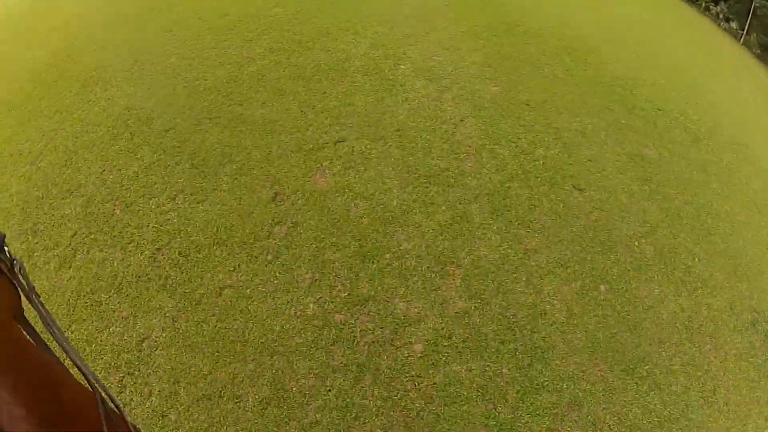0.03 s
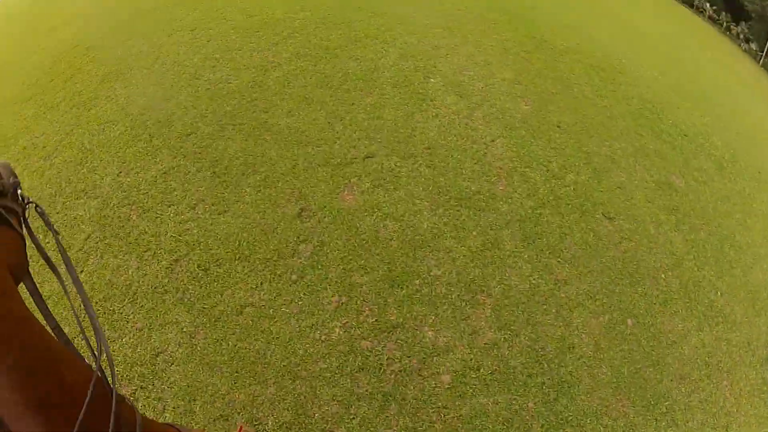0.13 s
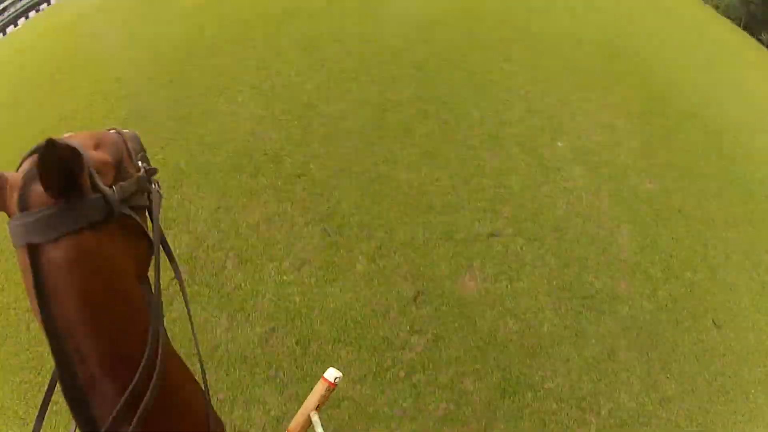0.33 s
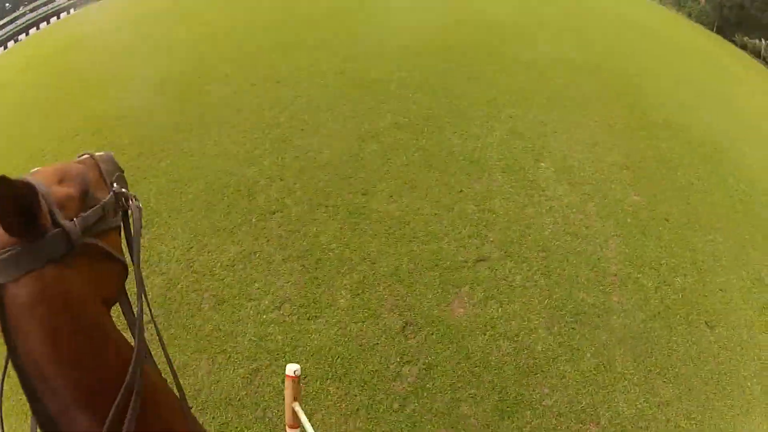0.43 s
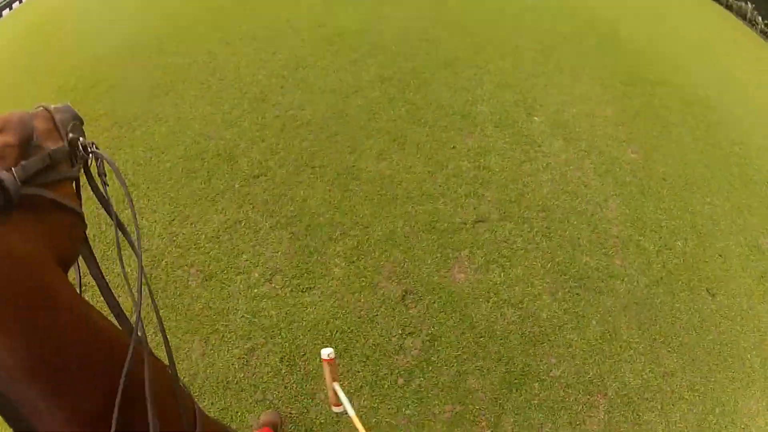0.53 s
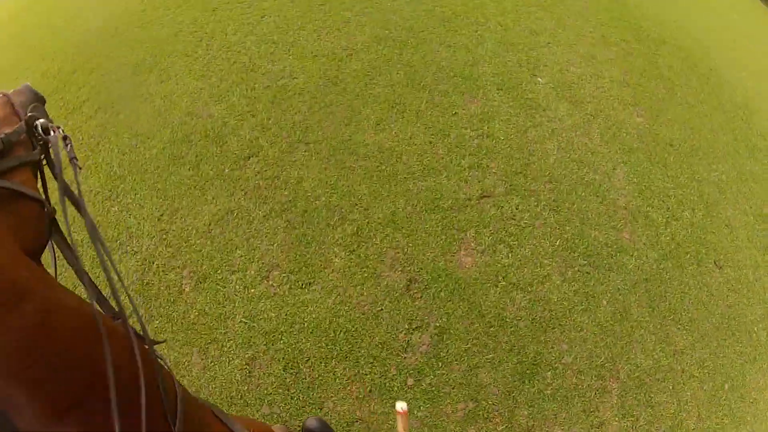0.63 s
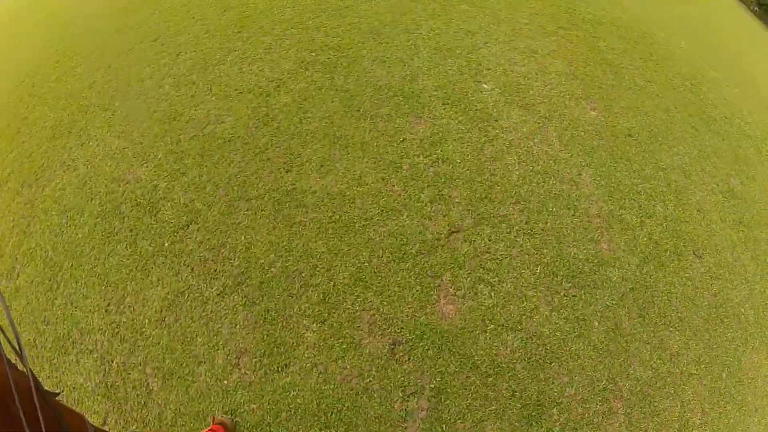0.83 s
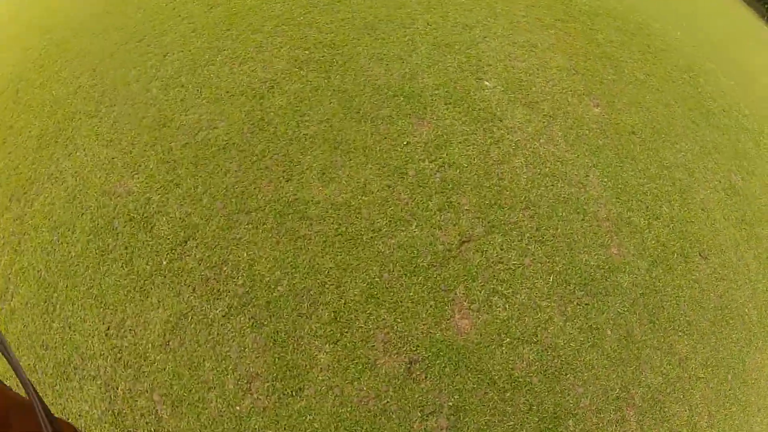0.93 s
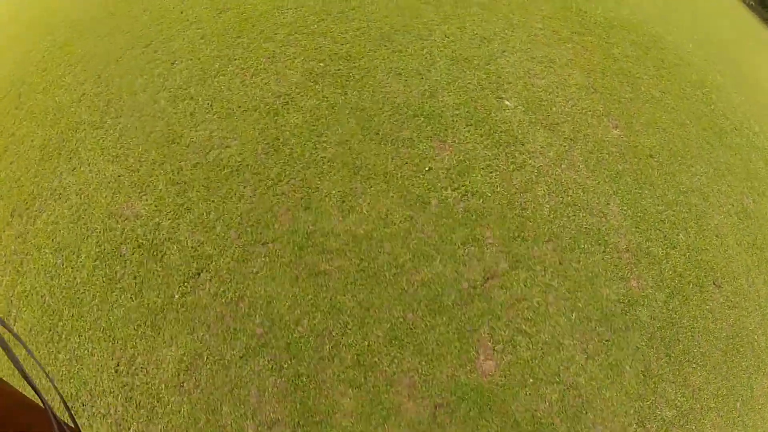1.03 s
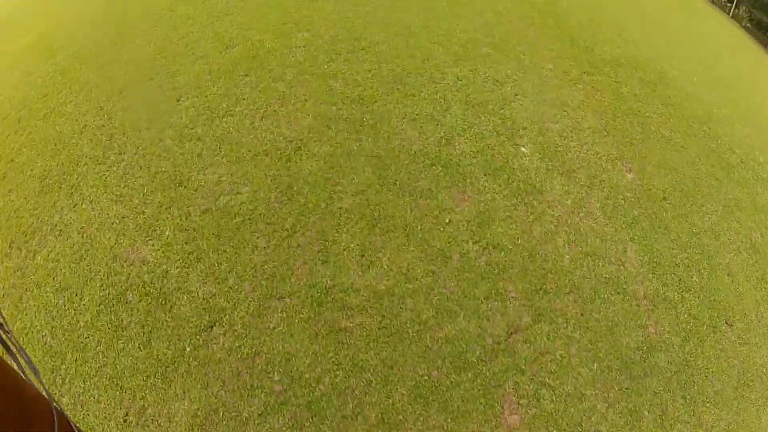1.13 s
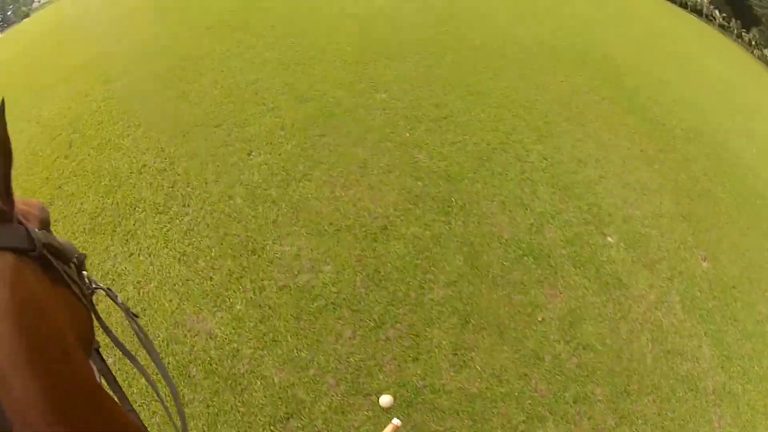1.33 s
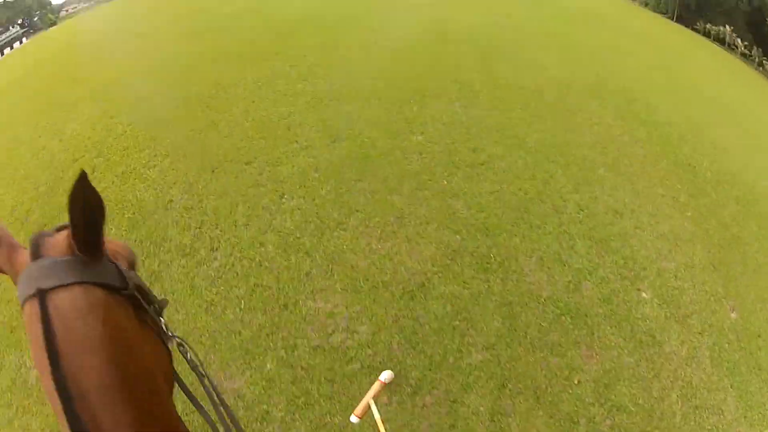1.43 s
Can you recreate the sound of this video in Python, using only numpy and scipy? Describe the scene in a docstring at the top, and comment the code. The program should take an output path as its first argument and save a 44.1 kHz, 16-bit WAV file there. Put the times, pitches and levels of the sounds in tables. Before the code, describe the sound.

A mallet cracks hard on a ball at 0.23 s, bright and woody with a very short hollow ring and no echo. A much weaker, clustered glancing knock follows at 1.20 s. Throughout, tack ticks and rustles, busier after 1.1 s; dull turf hoof thuds fall near 0.3, 0.6, 0.85 and 1.07 s. A strap creaks downward at 1.3 s. Low wind buffets the slightly gritty, muffled case microphone.

```python
"""A polo mallet cracks against a ball twice, heard from a cased camera on the rider of a cantering horse.
Each stroke is coloured contact impulses, gritty scrapes and decaying modes; hooves on turf are dull modes.
Tack ticks as impulses with grit and rustles as filtered noise; a strap creaks once on falling harmonics.
Wind buffets the case as filtered noise. The field is open, so nothing echoes.
The camera holds each of its coarse samples, which adds a thin sheen."""
import sys
import numpy as np
from scipy import signal
from scipy.fft import rfft, irfft, next_fast_len
from scipy.io import wavfile
from scipy.ndimage import map_coordinates

SR = 44100
rng = np.random.default_rng(int(sys.argv[2]) if len(sys.argv) > 2 else 0)


def master(y):
    """Save y as 16-bit WAV."""
    cut = np.clip(np.atleast_2d(y).T, -1, 1)
    pcm = np.round(cut * 32767)  # scale
    wavfile.write(sys.argv[1], SR, pcm.astype(np.int16))


N = 66150  # samples, 1.5 s
TIME = np.arange(N) / SR
HIT_TIME = np.arange(SR // 8) / SR  # time axis of one short sound
IMPULSE = 1.0 * (HIT_TIME == 0)
SIZE = next_fast_len(N + SR // 2)  # padded transform length
FREQS = np.fft.rfftfreq(SIZE, 1 / SR)


def amp(db):
    """Decibels to gain."""
    return 10 ** (np.asarray(db) / 20)


def unit(x):
    """Scale to rms 1."""
    return x / np.sqrt(np.mean(x ** 2) + 1e-20)


def burst(x):
    """Scale a short sound to the energy of 6 ms at rms 1."""
    return x / np.sqrt(np.sum(x ** 2) / (0.006 * SR) + 1e-20)


def coloured(x, points):
    """Causal minimum-phase filter through (Hz, dB) points, by folding the cepstrum."""
    hz, db = np.transpose(points)
    gain_db = np.interp(np.log(FREQS + 1), np.log(hz), db)
    cepstrum = irfft(np.log(amp(gain_db)), SIZE)
    cepstrum[1:SIZE // 2] *= 2
    cepstrum[SIZE // 2 + 1:] = 0
    response = np.exp(rfft(cepstrum))
    return irfft(rfft(x, SIZE) * response, SIZE)[:len(x)]


def curves(rows):
    """One value per sample for each column after the time."""
    times, *columns = np.transpose(rows)
    return [np.interp(TIME, times, column) for column in columns]


def wobble(rate):
    """A smooth random curve, rate knots a second."""
    knots = rng.standard_normal(int(N * rate / SR) + 4)
    return map_coordinates(knots, [TIME * rate])


def fade(t60):
    """Exponential decay by 60 dB in t60 seconds."""
    return np.exp(-np.log(1000) * HIT_TIME / t60)


def ring(modes, attack_s, stretch=1):
    """Damped modes with a soft start; stretch multiplies every pitch."""
    tone = sum(amp(db) * fade(t60) * np.sin(2 * np.pi * hz * stretch * HIT_TIME)
               for hz, db, t60 in modes)
    return burst(tone * (1 - np.exp(-HIT_TIME / attack_s)))


def grit(t60):
    """A dying puff of noise with energy 1."""
    puff = rng.standard_normal(len(HIT_TIME)) * fade(t60)
    return puff / np.linalg.norm(puff)


def struck(force, points):
    """Contact forces through a body of the given colour."""
    body_response = burst(coloured(IMPULSE, points))
    return signal.fftconvolve(force, body_response)[:N]


def add(track, start_s, sound):
    """Mix a sound in at its start time."""
    part = track[max(round(start_s * SR), 0):][:len(sound)]
    part += sound[:len(part)]


# Contacts of mallet and ball out on the open field, each stroke with its rebounds.
# Each row: start in seconds, crack level in dB, ring level in dB, scrape level in dB, ring pitch as a ratio.
MALLET_CONTACTS = [(.2327, -11, -12.5, -25.5, 1), (.2377, -27.5, -54, -29, 1),
                   (1.2012, -34, -39.5, -37, .96), (1.2037, -34.5, -24, -33, .96),
                   (1.2034, -24.5, -28.5, -29, .96), (1.2122, -37.5, -33, -40, 1.1)]
# The crack of wood on ball. Each row: frequency in Hz, relative level in dB.
CRACK_COLOUR = [(200, -19), (750, -2), (1000, -17.5), (1300, -6.5), (1500, 0), (1950, 4), (2450, -6),
                (2900, 1), (3400, -9), (4300, -19.5), (5200, -16), (6000, -13)]
# The hollow ring after a stroke.
# Each row: frequency in Hz before the pitch ratio, relative level in dB, decay by 60 dB in seconds.
HOLLOW_MODES = [(110, -17, 0.054), (351, -3.5, 0.03), (532, 5, 0.032), (720, 1.5, 0.013)]
# The dull knock of the mallet head.
# Each row: frequency in Hz, relative level in dB, decay by 60 dB in seconds.
HEAD_MODES = [(770, -0.5, 0.017), (1036, 1, 0.017), (1380, -3.5, 0.021)]
RING_LAG_S, RING_ATTACK_S, SCRAPE_T60_S = 0.0011, 0.00039, 0.015
GLANCE_S, GLANCE_DB = 1.2035, -27  # the second, glancing stroke also knocks the head


def mallet():
    """Each contact is a hard crack, a brief scrape and a hollow ring."""
    force, body = np.zeros((2, N))
    for start_s, crack_db, ring_db, scrape_db, pitch_ratio in MALLET_CONTACTS:
        crack = amp(crack_db) * IMPULSE
        scrape = amp(scrape_db) * grit(SCRAPE_T60_S)
        add(force, start_s, crack + scrape)
        hollow = amp(ring_db) * ring(HOLLOW_MODES, RING_ATTACK_S, pitch_ratio)
        add(body, start_s + RING_LAG_S, hollow)
    add(body, GLANCE_S, amp(GLANCE_DB) * ring(HEAD_MODES, RING_ATTACK_S))
    return struck(force, CRACK_COLOUR) + body


# Hoof falls on the turf, below the rider's microphone.
# Each row: start in seconds, level in dB, pitch in Hz, decay by 60 dB in seconds.
HOOF_FALLS = [(0.1335, -47, 150, 0.041), (.3085, -34, 392, 0.014), (0.588, -33, 132, 0.079),
              (0.8522, -26.5, 228, 0.03), (1.068, -33, 100, 0.076), (1.35, -39, 110, 0.024)]
HOOF_ATTACK_S = 0.0046
HOOF_BODY_RATIO, HOOF_BODY_DB = 0.7, -4  # a second, lower mode, relative to the first


def hooves():
    """Soft turf gives dull thuds: two quickly damped modes with a slow attack."""
    out = np.zeros(N)
    for start_s, db, hz, t60 in HOOF_FALLS:
        modes = [(hz, 0, t60), (hz * HOOF_BODY_RATIO, HOOF_BODY_DB, t60)]
        add(out, start_s, amp(db) * ring(modes, HOOF_ATTACK_S))
    return out


# Ticks of tack that knock through the camera mount.
# Each row: start in seconds before the lag, then, before the trims, bright click level in dB,
# woody clack level in dB and mount knock level in dB.
TACK_TICKS = [(0.023, -44, -47, -33.5), (0.0677, -40, -51, -40.5), (0.081, -42, -50, -36.5),
              (0.0995, -44, -55, -37.5), (0.1313, -30, -41.5, -37.5), (0.1521, -38, -51, -38),
              (0.2773, -40, -51, -48), (0.3072, -42, -44.5, -26), (0.3904, -55, -50.5, -41),
              (0.4264, -45, -37, -48), (0.5014, -48, -45.5, -46), (0.5207, -34.5, -44.5, -41.5),
              (0.5471, -37, -47, -45), (0.5591, -38, -48, -37), (0.7846, -42.5, -56, -40),
              (0.8385, -42, -57, -50), (0.85, -38, -49.5, -37.5), (0.8731, -41, -59, -45),
              (0.9562, -40.5, -47.5, -43), (0.9956, -43, -48, -43), (1.0913, -37, -46.5, -42),
              (1.1237, -40.5, -55, -38), (1.1368, -35.5, -42, -31.5), (1.2461, -38, -53, -32),
              (1.2623, -38, -48, -34), (1.2864, -34, -51, -28.5), (1.3285, -34.5, -44.5, -31.5),
              (1.3774, -35.5, -62, -29.5), (1.4162, -36, -49.5, -35.5), (1.4467, -32.5, -49.5, -33.5),
              (1.163, -39, -50, -43), (1.1726, -36.5, -48, -39), (1.1812, -38.5, -47, -30),
              (1.1906, -30.5, -48, -30.5)]
# The bright tick of tack. Each row: frequency in Hz, relative level in dB.
CLICK_COLOUR = [(300, -7), (1500, -12), (2200, 4), (2800, 7.5), (3600, 0), (4500, -6.5), (5100, -4),
                (5800, -14)]
# The woody tick of tack. Each row: frequency in Hz, relative level in dB.
CLACK_COLOUR = [(300, -2.5), (1100, 0), (1400, -3), (1750, -3), (2200, 2.5), (3000, -2.5), (6000, -45)]
# The knock of the mount that carries the camera.
# Each row: frequency in Hz before a random detune, relative level in dB, decay by 60 dB in seconds.
MOUNT_MODES = [(374, 8.5, 0.015), (522, 11.5, .022), (601.5, 6, 0.03)]
CLICK_TRIM_DB, CLACK_TRIM_DB, KNOCK_TRIM_DB = -12.5, -5, -2
TICK_LAG_S, TICK_T60_S = 0.001, 0.023
TICK_GRIT_DB = 1.5  # relative to the impulse of the contact
KNOCK_ATTACK_S, KNOCK_DETUNE = 0.0026, 0.05  # detune is a standard deviation, as a ratio


def tack():
    """Gritty ticks, woody or bright, each with a small knock of the mount."""
    clicks, clacks, knocks = np.zeros((3, N))
    for start_s, click_db, clack_db, knock_db in TACK_TICKS:
        start_s = start_s + TICK_LAG_S
        contact = IMPULSE + amp(TICK_GRIT_DB) * grit(TICK_T60_S)
        add(clicks, start_s, amp(click_db + CLICK_TRIM_DB) * contact)
        add(clacks, start_s, amp(clack_db + CLACK_TRIM_DB) * contact)
        stretch = 1 + KNOCK_DETUNE * rng.standard_normal()
        knock = ring(MOUNT_MODES, KNOCK_ATTACK_S, stretch)
        add(knocks, start_s, amp(knock_db + KNOCK_TRIM_DB) * knock)
    return struck(clicks, CLICK_COLOUR) + struck(clacks, CLACK_COLOUR) + knocks


# Rise and fall of the roar in the case and of the rustle on the rider, before trims and flutter.
# Each row: time in seconds, roar level in dB, rustle level in dB.
MOTION_LEVELS = [(0, -40.5, -60), (0.06, -48, -63), (0.15, -38, -58.5), (0.21, -49, -61),
                 (0.28, -40, -62.5), (0.35, -47, -60), (0.43, -41, -59), (0.49, -45.4, -64),
                 (0.56, -43, -63.5), (0.62, -38, -58.5), (0.66, -52.5, -66), (0.73, -50, -63),
                 (0.78, -41.5, -66), (0.91, -54, -63), (0.98, -41, -59.7), (1.07, -46, -65.5),
                 (1.15, -43.5, -59), (1.5, -45.5, -65)]
# The colour of the rustling tack. Each row: frequency in Hz, relative level in dB.
RUSTLE_COLOUR = [(300, 5.5), (1000, 3.5), (1500, -4), (2100, 1.5), (2800, 0), (3600, -3.5), (4500, -5.5),
                 (5100, -5), (5700, -18), (6000, -25)]
HISS_DB, GRAIN_DB = 1.5, 4.5  # relative to the rustle level
GRAINS_PER_S, GRAIN_SPREAD_DB = 750, -4  # the spread scales an exponential draw, capped at 3
RUSTLE_FLUTTER_DB, RUSTLE_FLUTTER_KNOTS_PER_S = -2.07, 39.44
SWING_S, SWING_WIDTH_S, SWING_DB = 1.22, 0.056, 3.5  # grains rattle harder around the second swing


def rustle():
    """Cloth and leather rub: an uneven fine hiss with tiny grains that swell as the rider swings."""
    _, level_db = curves(MOTION_LEVELS)
    spread_db = GRAIN_SPREAD_DB * np.minimum(rng.exponential(size=N), 3)
    sizes = amp(spread_db) * rng.choice([-1, 1], N)
    grain_starts = rng.random(N) < GRAINS_PER_S / SR
    grains = unit(coloured(sizes * grain_starts, RUSTLE_COLOUR))
    hiss = unit(coloured(rng.standard_normal(N), RUSTLE_COLOUR))
    swing_db = SWING_DB * np.exp(-((TIME - SWING_S) / SWING_WIDTH_S) ** 2)
    level = amp(level_db + RUSTLE_FLUTTER_DB * wobble(RUSTLE_FLUTTER_KNOTS_PER_S))
    return level * (amp(HISS_DB) * hiss + amp(GRAIN_DB + swing_db) * grains)


# The strap's harmonics, on the rider. Each row: multiple of the pitch, relative level in dB.
CREAK_HARMONICS = [(1, 0), (2, -7), (3, -20.5)]
CREAK_S, CREAK_LENGTH_S, CREAK_DB = 1.292, 0.0507, -34
CREAK_FROM_HZ, CREAK_TO_HZ = 390, 264  # before the jitter
CREAK_JITTER, CREAK_JITTER_KNOTS_PER_S = 0.026, 150  # jitter as a ratio of the pitch


def creak():
    """A strap slips ever more slowly as it takes the load, so the pitch falls."""
    progress = np.clip((TIME - CREAK_S) / CREAK_LENGTH_S, 0, 1)
    glide = CREAK_FROM_HZ + (CREAK_TO_HZ - CREAK_FROM_HZ) * progress ** 2
    pitch = glide * (1 + CREAK_JITTER * wobble(CREAK_JITTER_KNOTS_PER_S))
    phase = 2 * np.pi * np.cumsum(pitch) / SR
    tone = sum(amp(db) * np.sin(round(multiple) * phase) for multiple, db in CREAK_HARMONICS)
    swell = np.sqrt(np.abs(np.sin(np.pi * progress ** 2)))
    return amp(CREAK_DB) * swell * tone


# The wind's push on the camera case. Each row: time in seconds, level in dB.
BUFFET_LEVELS = [(0, -42), (0.17, -42.5), (0.35, -44.5), (0.58, -43), (0.7, -51.5), (0.8, -48.0),
                 (0.92, -47), (1.06, -44), (1.22, -46), (1.45, -43)]
# The colour of the buffeting at the case. Each row: frequency in Hz, relative level in dB.
BUFFET_COLOUR = [(15, -0.5), (30, -22), (60, 0.5), (110, -2.5), (170, -7.5), (300, -31), (700, -53)]
# The colour of the roar inside the case. Each row: frequency in Hz, relative level in dB.
ROAR_COLOUR = [(60, -60), (160, -1), (280, 2), (420, 1.5), (540, -1), (660, -2), (800, -13), (1000, -30.5),
               (1500, -26.5), (4000, -45)]
ROAR_TRIM_DB, ROAR_FLUTTER_DB, ROAR_FLUTTER_KNOTS_PER_S = -0.5, 3, 60.35


def wind():
    """Low buffeting and a fluttering roar inside the case, both filtered noise."""
    buffet_db, = curves(BUFFET_LEVELS)
    roar_db, _ = curves(MOTION_LEVELS)
    buffet = unit(coloured(rng.standard_normal(N), BUFFET_COLOUR))
    roar = unit(coloured(rng.standard_normal(N), ROAR_COLOUR))
    flutter_db = ROAR_FLUTTER_DB * wobble(ROAR_FLUTTER_KNOTS_PER_S)
    return amp(buffet_db) * buffet + amp(roar_db + ROAR_TRIM_DB + flutter_db) * roar


def scene():
    """Everything at the one microphone, as a single channel."""
    return (mallet() + hooves() + tack() + rustle() + creak() + wind())[None]


HOLD_HZ, TOP_HZ = 12000, 15450  # the camera's coarse sample rate and its upper band limit
CLIP_LEVEL = 1.15  # amplitude that the soft limit approaches


def record(dry):
    """The camera samples coarsely, squashes the loudest peak, holds each sample and limits the band."""
    coarse = signal.resample_poly(dry[0], HOLD_HZ, SR)
    squashed = coarse / (1 + (coarse / CLIP_LEVEL) ** 6) ** (1 / 6)
    # repeating each sample leaves mirror images of the band above it: the sheen
    held = signal.resample_poly(np.repeat(squashed, 4), SR, 4 * HOLD_HZ)
    band_limit = 1 / (1 + (FREQS / TOP_HZ) ** 90)
    return irfft(rfft(held, SIZE) * band_limit, SIZE)[None, :N]


dry = scene()
out = record(dry)
master(out)
```